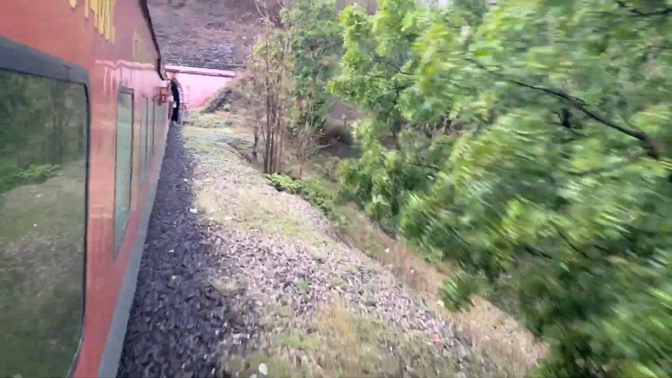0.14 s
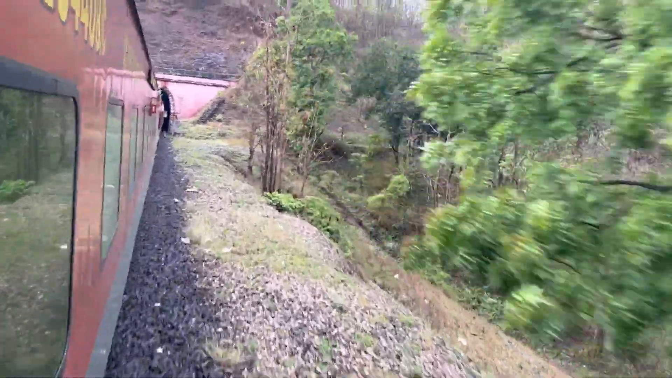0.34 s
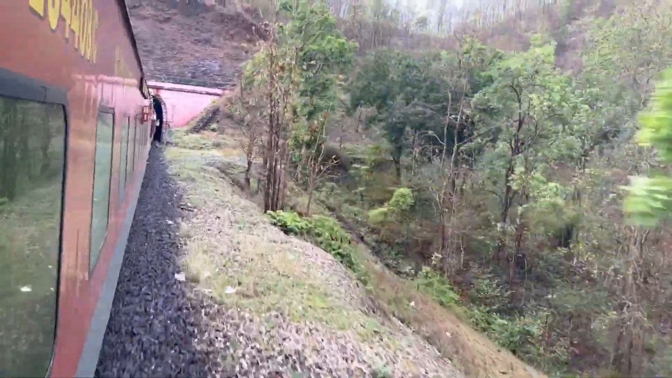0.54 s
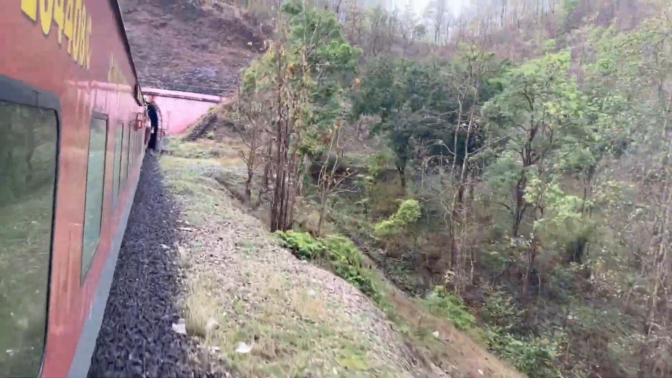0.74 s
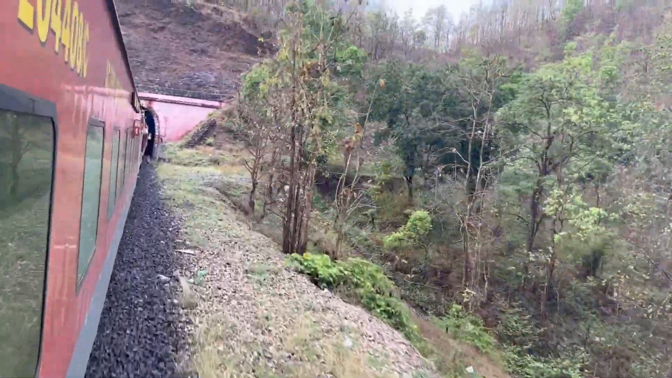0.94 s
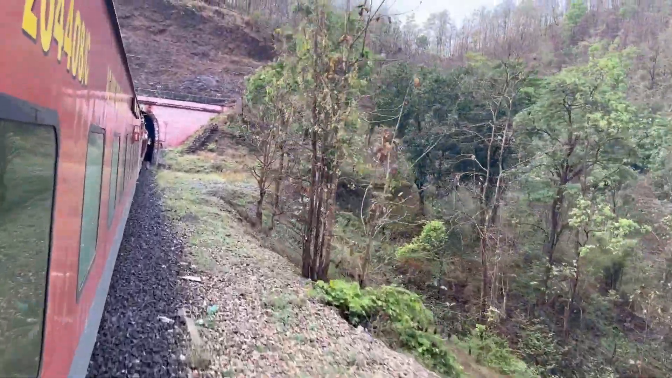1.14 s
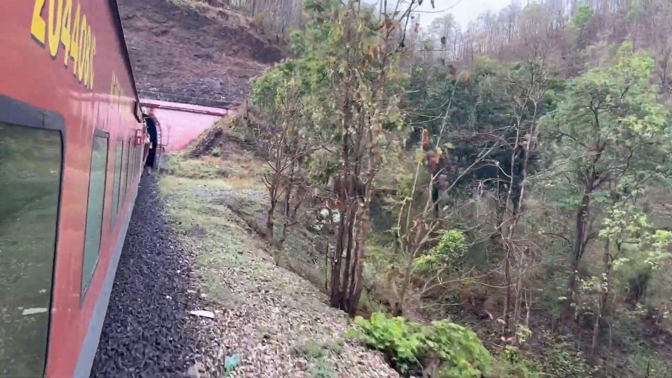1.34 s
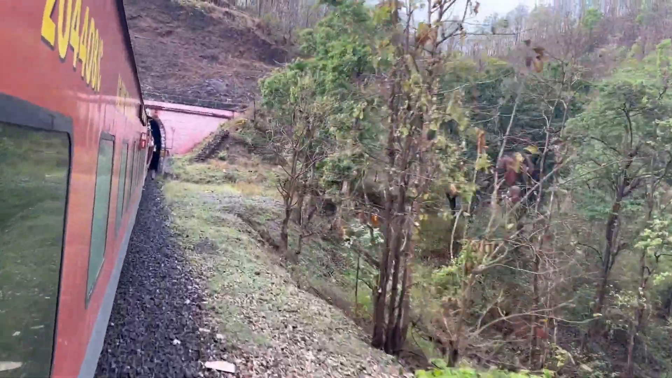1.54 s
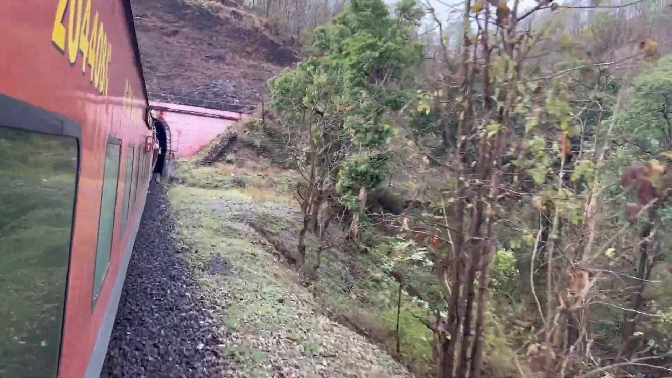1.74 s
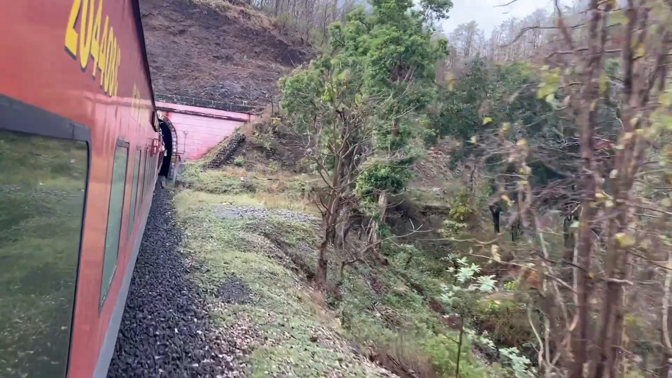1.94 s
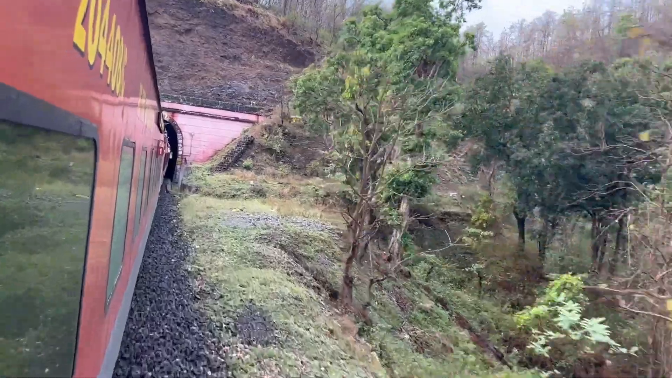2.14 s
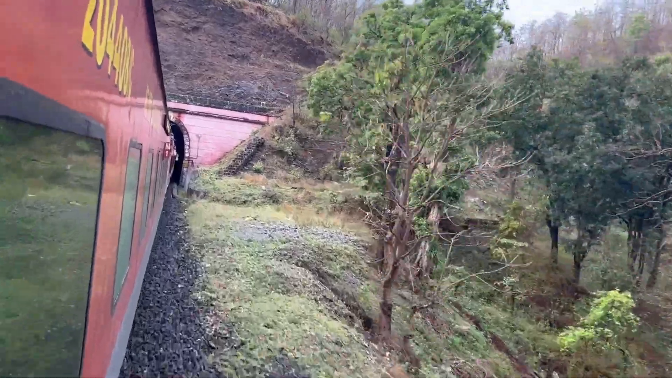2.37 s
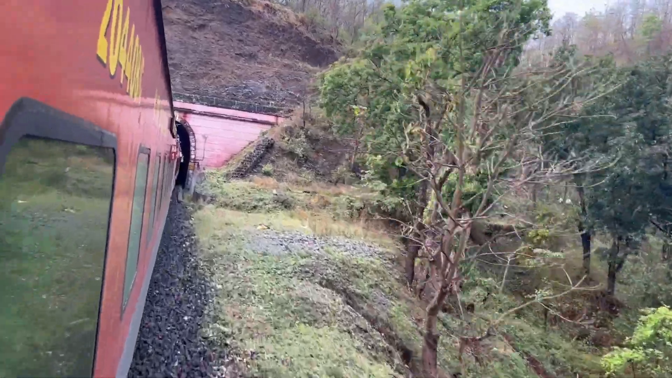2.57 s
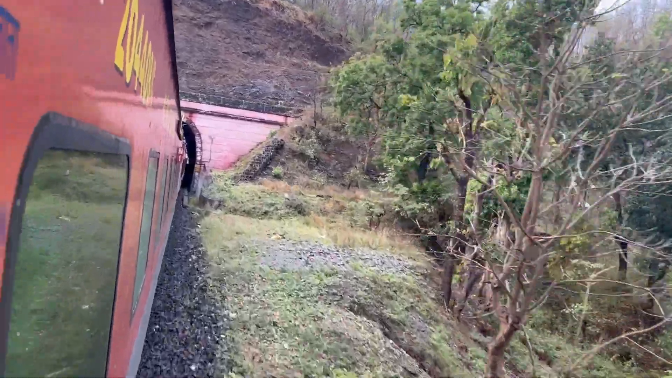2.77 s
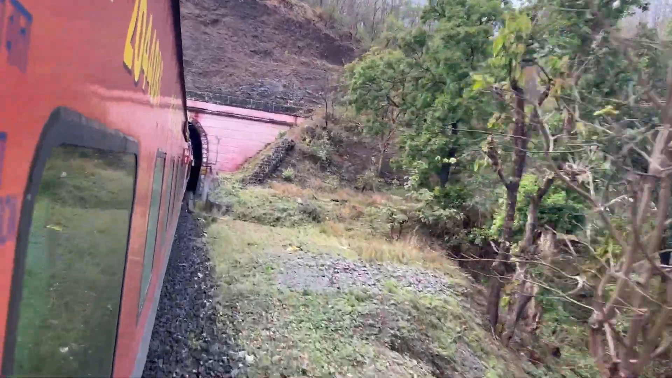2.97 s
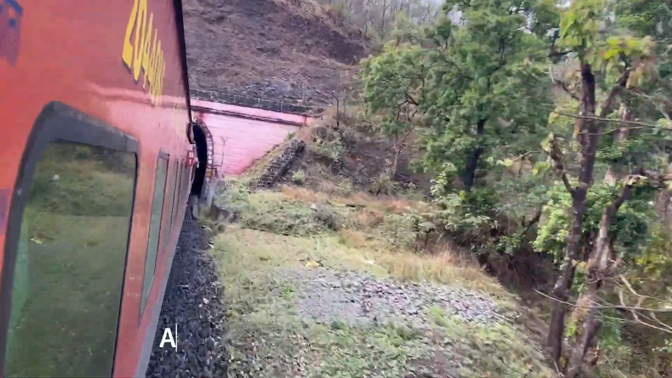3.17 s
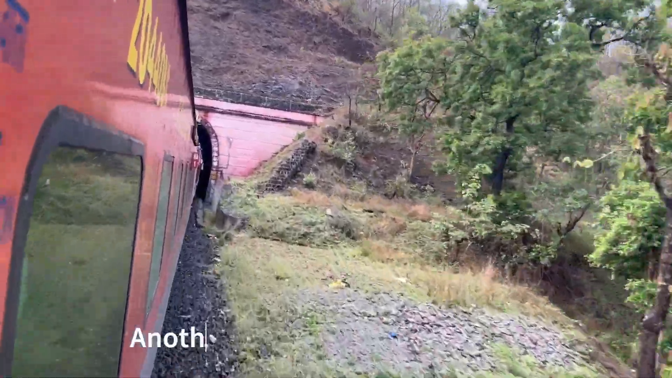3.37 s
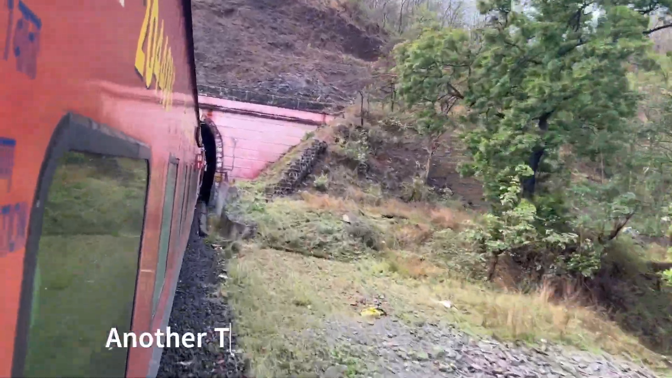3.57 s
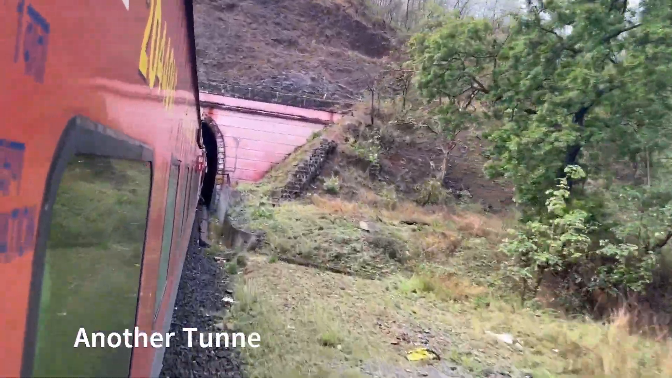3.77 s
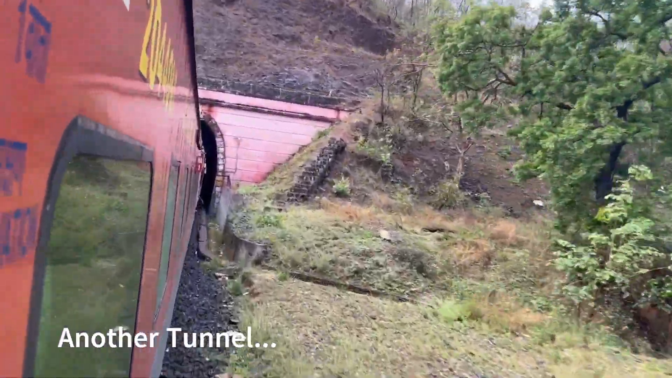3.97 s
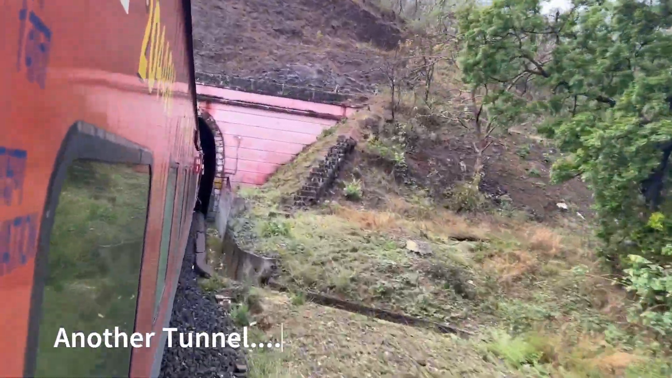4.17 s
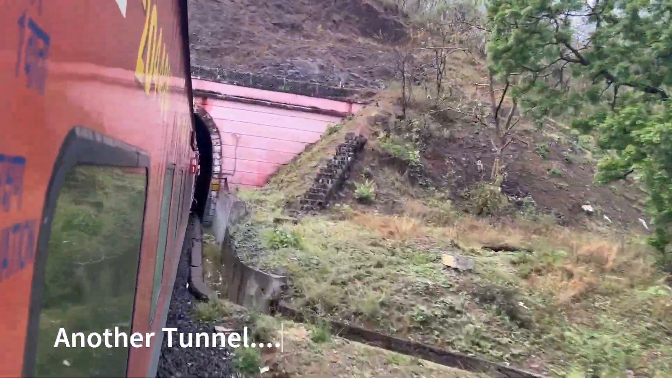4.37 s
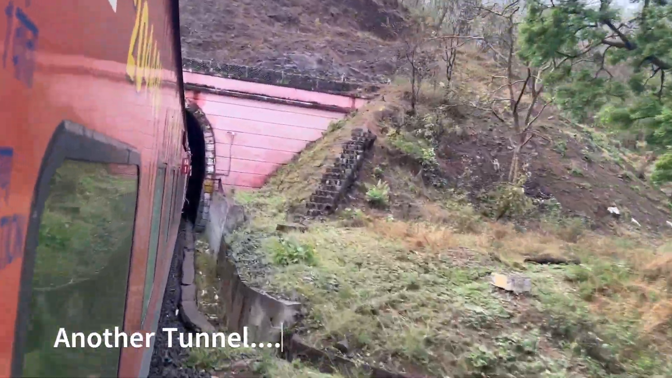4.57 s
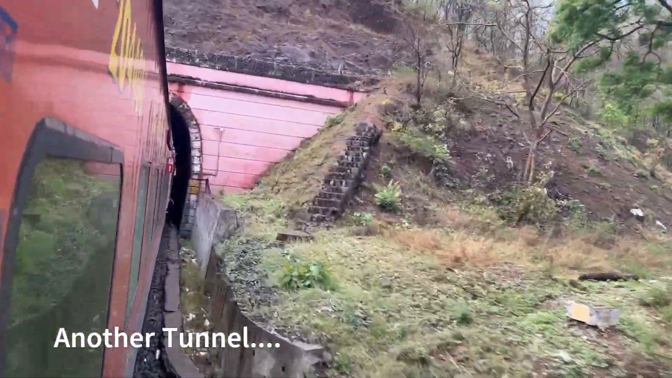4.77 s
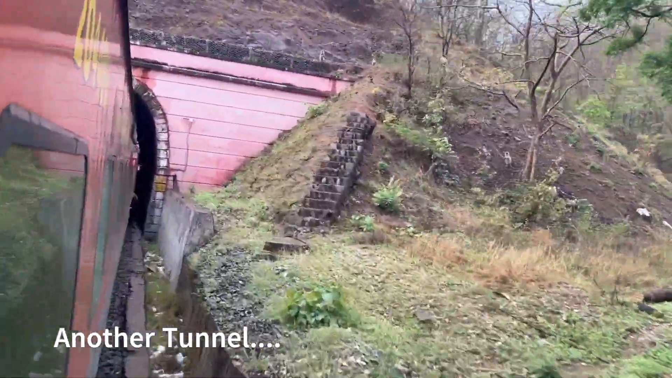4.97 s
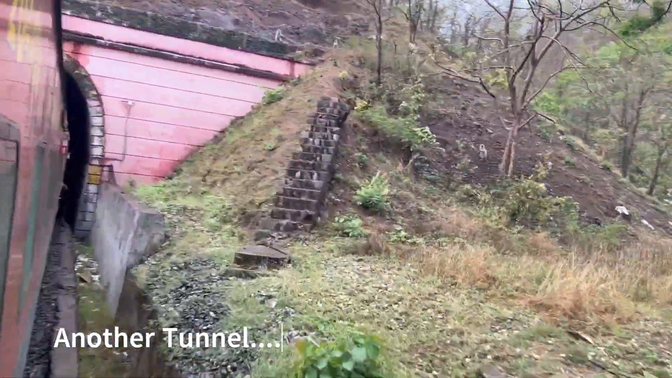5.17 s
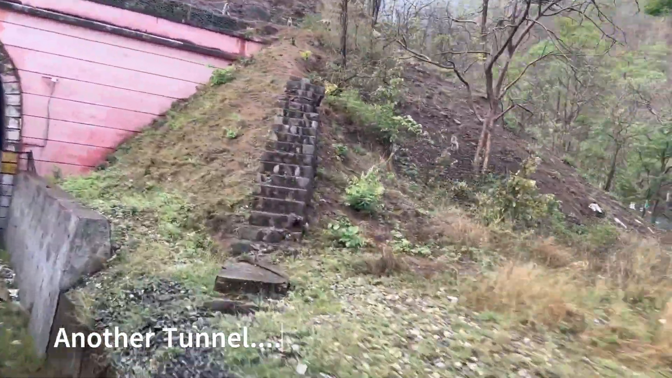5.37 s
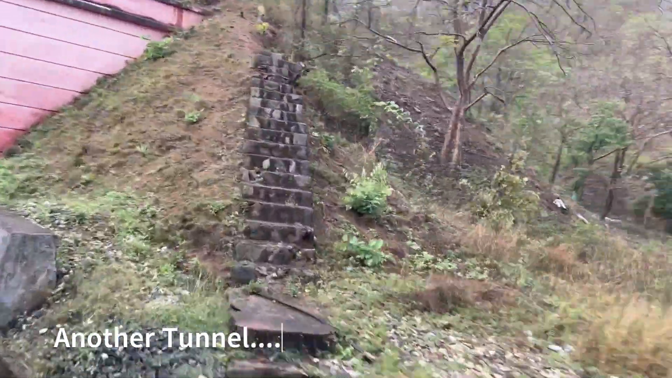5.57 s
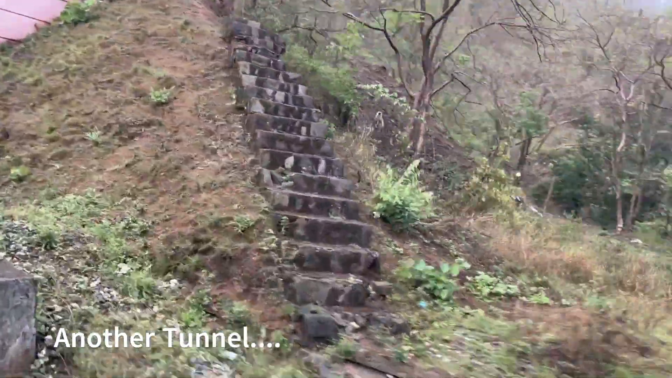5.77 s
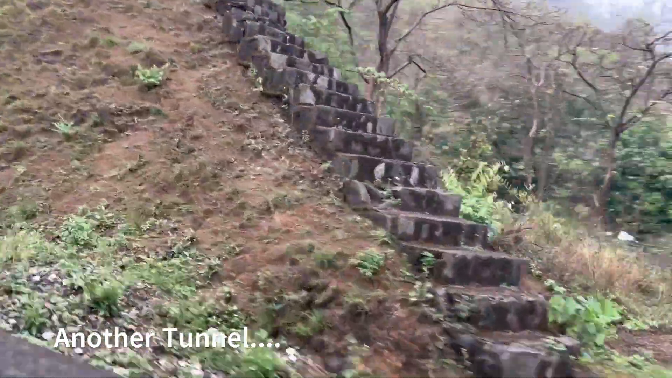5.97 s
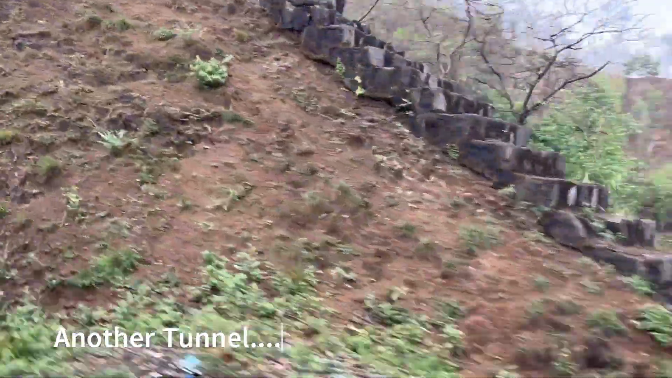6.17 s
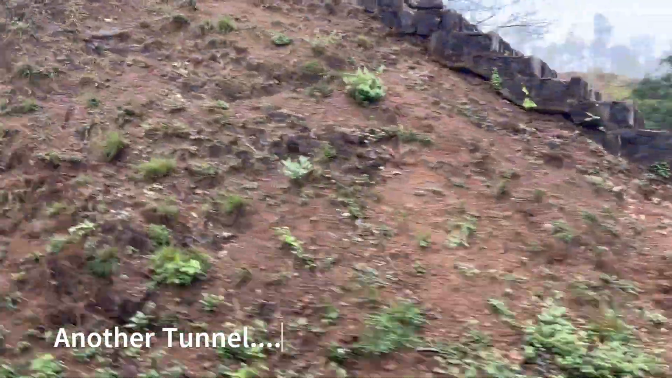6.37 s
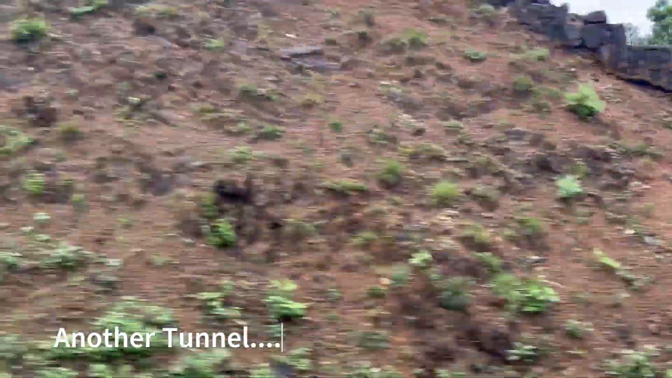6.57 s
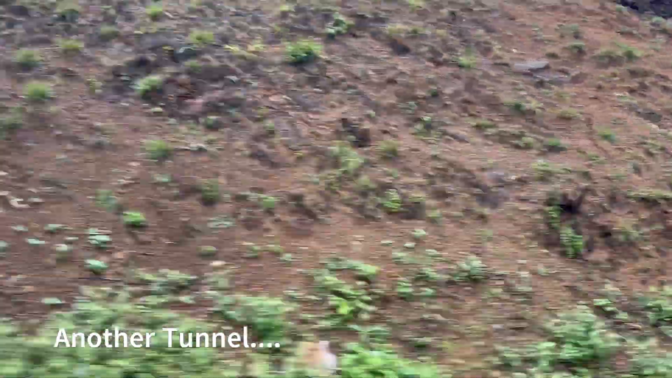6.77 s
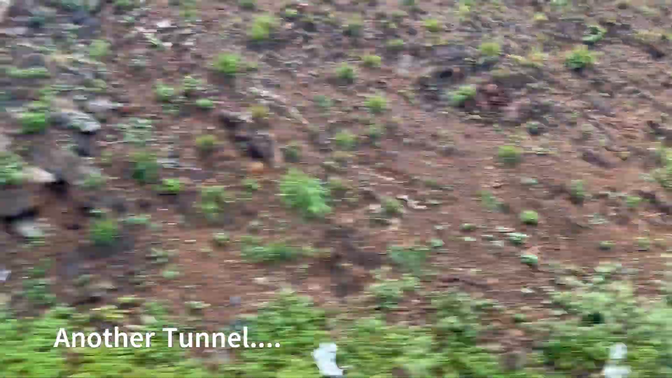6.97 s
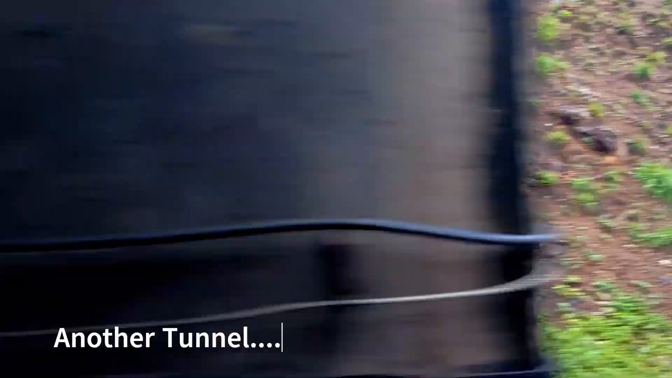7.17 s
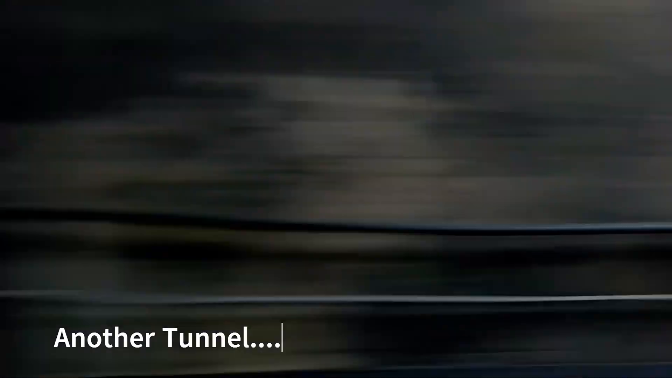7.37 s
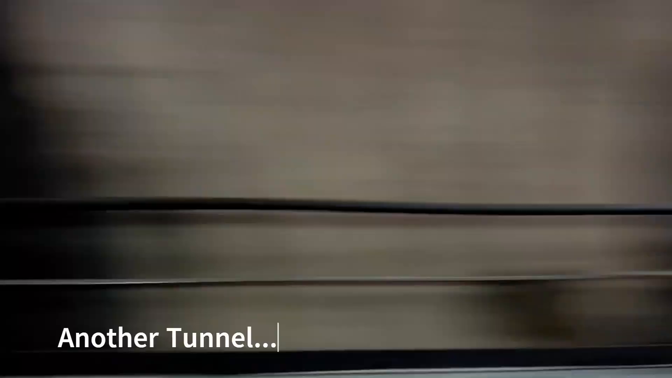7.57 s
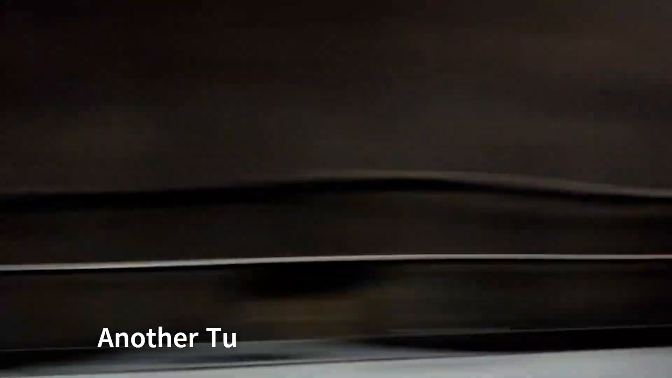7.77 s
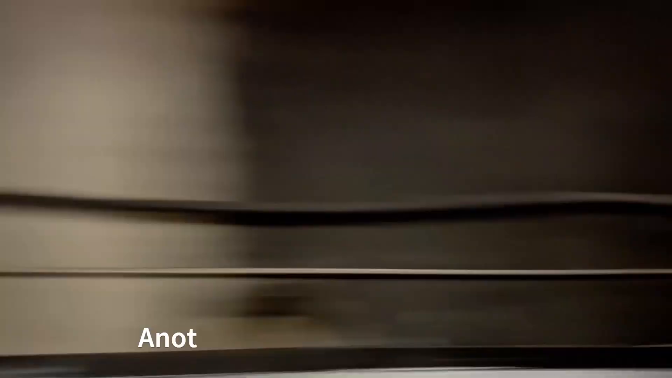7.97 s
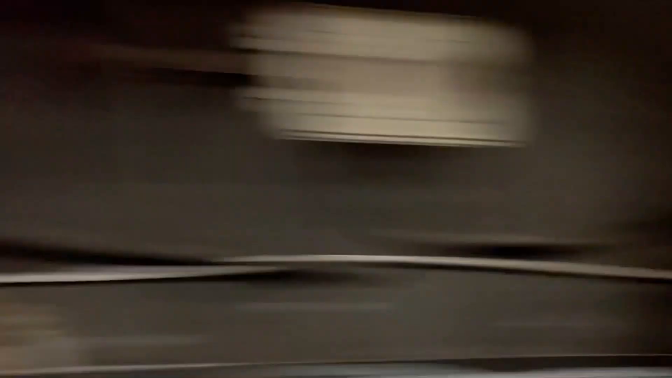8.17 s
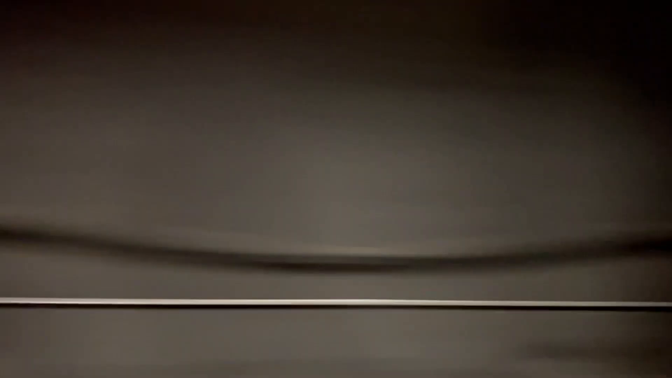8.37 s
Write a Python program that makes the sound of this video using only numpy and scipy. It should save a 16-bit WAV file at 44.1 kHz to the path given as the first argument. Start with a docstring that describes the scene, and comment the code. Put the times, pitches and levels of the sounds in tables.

```python
"""Gusty slipstream buffets a phone held out of the door of a running passenger train: eddies as coloured pops
and one-cycle slaps, over band noise for the roar of wheels on rails and a hiss that throbs once a wheel turn.
Noise bursts clack at the joints, single cycles tick, bands of roar flare, and sine tones sing from a wheel.
A cutting throws the roar back; then the tunnel mouth swallows the wind and modes of the bore fill it with a
deep boom."""
import sys
import numpy as np
from scipy import signal
from scipy.fft import rfft, irfft, next_fast_len
from scipy.io import wavfile
from scipy.ndimage import uniform_filter1d

SR = 44100
rng = np.random.default_rng(int(sys.argv[2]) if len(sys.argv) > 2 else 0)


def wav_out(sig):
    """Save sig, one row per channel (or a flat mono array), as 16-bit PCM at SR to the path in sys.argv[1]."""
    wavfile.write(sys.argv[1], SR, np.round(np.clip(np.atleast_2d(sig).T, -1, 1) * 32767).astype(np.int16))


N = 371753
BINS = next_fast_len(N)

# Spectra are relative: (frequency [Hz], level [dB])
# steady rolling through the coach
RUMBLE_SPECTRUM = [(53, -28), (90, -3.5), (284, -2.5), (349, -3), (661, -12), (1200, -20), (1560, -57),
                   (2640, -120)]
RUMBLE_DB = -29
# rail roar
ROAR_SPECTRUM = [(470, 2), (800, -0.5), (1280, -7), (1540, -7), (2010, -8.5), (2720, -10), (3590, -13),
                 (3970, -12), (4540, -13.5), (6000, -27), (7800, -23), (13200, -120)]
# tread hiss
HISS_SPECTRUM = [(1500, -58), (3000, -19), (4500, -1), (5500, -4.5), (7000, -3), (8500, -5.5),
                 (11000, -9.5), (12500, -8.5), (14500, -13.5), (15100, -18), (16000, -30)]
# open-air eddies
EDDY_SPECTRUM = [(53, -71), (90, 2.5), (452, -2.5), (901, -17), (1420, -28.5), (1550, -26), (1990, -33.5),
                 (3000, -31.5), (3900, -75), (6600, -120)]
# open-air slow buffeting
BUFFET_SPECTRUM = [(12, -51), (20, -29), (34, -18), (54, 2.5), (70, 2), (160, -8), (210, -5.5), (350, -120)]
# roar off the cutting
CUTTING_SPECTRUM = [(59, -52), (100, -21), (220, 0), (334, -2.5), (367, -2), (576, 0.5), (855, -10),
                    (1600, -20.5), (2080, -35), (3520, -120)]
# roar in the tunnel bore
BORE_SPECTRUM = [(59, -36), (100, -6), (116, -5.5), (225, -4), (350, 1), (436, -3.5), (700, -11),
                 (972, -15), (1160, -31), (1600, -25), (2080, -45), (3520, -120)]
# deep boom of the bore
BOOM_SPECTRUM = [(12, -51), (20, -19), (35, -43), (54, 5.5), (86, -0.5), (113, 5.5), (160, -4), (210, -12),
                 (350, -120)]
# unlike sound at the two ports: (frequency [Hz], side minus mid [dB])
PORT_DIFFERENCE = [(60, -19), (110, -15.5), (200, -10), (400, -8), (700, -5.5), (1250, -0.5), (1550, 2),
                   (1800, -9.5), (2600, -3.5), (4400, -4), (6000, 6.5)]
# balance of the ports: (frequency [Hz], left minus right [dB])
LEFT_LEAN = [(60, 0), (110, 0), (200, 0.0), (380, 1.0), (700, 4), (1290, -2), (2380, 3.5), (4400, 2),
             (8120, 10), (15000, -5.5)]

# Resonances: (frequency [Hz], width [Hz], relative level [dB])
WHEEL_MODES = [(1540, 56, 0), (1787, 51, 1), (2164, 18, 0), (2342, 40, -2.5), (2683, 60, -5),
               (3205, 66, -7), (3946, 62, -7.5), (4660, 150, -14.5)]
BORE_MODES = [(101, 43, -4), (125, 24, -8), (209, 48, -7), (352, 44, 0.5), (476, 50, -9), (610, 83, -12.5)]

# wheels on rail: (time [s], hiss between throbs [dB], roar [dB], nominal throb height [dB])
ROLLING = [(0, -49.5, -35, 4), (.8, -48.5, -36, 4), (1.2, -49.5, -39, 0.5), (1.6, -50, -34, 5.5),
           (2.5, -50, -37, 3), (3, -49, -33, 1), (3.45, -50, -35, 1), (3.7, -47.5, -33.5, 4.5),
           (4.6, -49.5, -33, 4.5), (5.1, -44.5, -29.5, 1), (5.6, -46, -31, -0.5), (6.02, -48, -30.5, 5.5),
           (6.3, -45, -27, 7.5), (6.7, -41.5, -27.5, 9), (6.9, -41, -25, 2), (7.05, -43, -25, 4),
           (7.3, -45.5, -26.5, 7.5), (7.7, -41.5, -29.5, 6.5), (7.95, -43.5, -29.5, 6),
           (8.2, -45, -29.5, 6), (8.43, -45, -29, 2)]
# extra hiss off the throb: (time [s], hiss level [dB], 1/e half-width [s])
SWISHES = [(1.447, -43.5, 0.024), (2.521, -38, 0.009), (2.89, -45, .03), (3.055, -42, 0.018),
           (4.34, -47, .03), (6.31, -35.5, 0.026), (6.523, -39, 0.02), (6.816, -32.5, 0.05),
           (7.1, -43, 0.02)]
# bands that flare: (time [s], bell sigma [s], centre [Hz], bandwidth [Hz], rms before the bell [dB])
FLARES = [(.705, .012, 4600, 400, -46), (.74, .022, 4900, 600, -42), (2.513, .004, 6200, 2600, -37),
          (5.1, .15, 4500, 800, -46), (5.06, .07, 2700, 250, -42), (5.22, .02, 2500, 700, -37),
          (6.792, .009, 680, 300, -14), (6.792, .006, 1150, 300, -21), (7.45, .12, 450, 400, -21),
          (6.81, .025, 1600, 1300, -26), (6.835, .025, 2900, 2600, -28), (7.6, 0.046, 12540, 80, -52),
          (7.76, .06, 11080, 120, -49), (8.18, .04, 11080, 120, -49), (6.3, 0.031, 479, 50, -20.5),
          (6.4, .02, 480, 50, -20.5), (6.94, .02, 362, 40, -20.5), (6.99, .04, 540, 60, -18.5),
          (7.11, 0.039, 503, 90, -19), (7.25, .03, 535, 60, -22), (7.3, 0.098, 850, 200, -28),
          (7.39, .04, 370, 40, -15.5), (7.559, 0.049, 356, 30, -14.5), (7.79, 0.027, 500, 90, -24),
          (8.3, 0.031, 476, 81, -24)]
# singing wheel: (start [s], rise [s], fade t60 [s], pitch [Hz], pitch arch [Hz], nominal level [dB])
SONGS = [(2.222, 0.025, 2.5, 1603, 0, -31), (2.44, .01, .3, 1585, 0, -36), (3.046, .015, .12, 1545, 0, -29),
         (4.415, .008, .1, 1490, 0, -31), (6.791, .016, 0.13, 1770, -2, -14),
         (6.795, .03, .1, 3236, 2, -23), (6.825, .012, .13, 1790, 0, -23), (6.785, .015, .3, 2170, 0, -27),
         (6.81, .012, .15, 4000, 0, -31), (6.79, .012, .12, 2640, 0, -28), (6.785, .01, .1, 1150, 0, -24),
         (7.085, 0.023, .2, 2340, 0, -33)]
# metal on metal: (time [s], nominal level [dB], centre [Hz])
TICKS = [(0.255, -25, 1500), (0.5407, -19, 1500), (1.9804, -24, 1500), (2.2508, -15, 1200),
         (2.3401, -21, 1500), (2.5105, -27, 6000), (2.7871, -15, 1200), (2.8654, -20, 1500),
         (3.0524, -19, 1500), (3.4526, -21, 1500), (3.4634, -22, 1500), (4.2527, -22, 1500),
         (4.3655, -19, 1500), (4.69, -20, 1500), (5.3044, -20, 1500), (5.3507, -15, 1150),
         (5.3732, -17, 1300), (5.4141, -19, 1500), (5.4805, -11, 1050), (5.5698, -17, 1300),
         (5.582, -17, 1400), (5.5974, -20, 1500), (5.7159, -12, 1400), (5.738, -16, 1400),
         (5.8584, -10, 1100), (6.7895, -14, 1100), (7.0773, -16, 2400), (7.106, -14, 1500)]
# wheels over joints: (time [s], blow level [dB], clank centre [Hz], thud re blow [dB], treble re blow [dB],
# wheel ring re blow [dB], t60 [s]); levels before the mix gains in joints()
CLACKS = [(2.3422, -26, 1570, 1, -27.5, -6, 0.096), (2.5045, -27, 2600, -13, -5, -19, 0.13),
          (2.8657, -23.5, 1890, 1, -23, -17, 0.17), (3.052, -21.5, 1540, 5.5, -26, -6, 0.13),
          (3.4516, -20.5, 1490, -5, -29, -10, 0.14), (5.5714, -20, 1450, 6, -26, -9, 0.11),
          (5.7292, -18, 1450, 5, -27, -11, 0.1), (6.1467, -22.5, 2640, 7, -19, -23, 0.14),
          (6.2995, -33, 1550, 6, -17, -12, 0.12), (6.494, -21, 1460, 3, -12, -14, 0.15),
          (6.7885, -19, 1740, 3.5, -12, -13, 0.22), (7.0773, -14.5, 2200, 2, -11, -21, 0.13),
          (7.1055, -20, 1600, 2, -18, -12, .22)]
# strong eddies: (time [s], nominal level [dB], centre [Hz], edge re slap [dB], flutter decay to 1/e [s]);
# levels before the mix gains in slaps()
SLAPS = [(0.158, -12, 301, -22, 0.01), (0.252, -18, 308, -20, 0.014), (0.338, -16, 317, -23, 0.012),
         (0.939, -13, 316, -22, 0.016), (1.138, -16, 384, -26, 0.0089), (1.29, -13, 380, -30, 0.0058),
         (1.349, -6.5, 326, -21, 0.003), (1.418, -12.5, 363, -18, 0.0098), (1.524, -10, 430, -28, 0.0076),
         (1.898, -14, 646, -22, 0.012), (1.983, -14, 301, -27, 0.0087), (1.975, -14, 666, -23, 0.012),
         (2.151, -10.5, 375, -21, 0.009), (2.249, -5, 317, -35, 0.0074), (2.288, -8, 375, -26, 0.0037),
         (2.34, -11, 493, -14, 0.012), (2.777, -10, 720, -24, .004), (2.787, -8, 210, -14, .004),
         (2.862, -13, 680, -20, .008), (2.986, -14, 470, -23, 0.0078), (3.351, -14, 365, -23, 0.014),
         (3.393, -12, 466, -23, 0.014), (3.457, -9.5, 455, -21, 0.013), (3.572, -18, 307, -17, 0.0036),
         (3.758, -11.5, 576, -17, 0.0059), (4.123, -11.5, 580, -22, 0.0089), (4.199, -16, 560, -20, .006),
         (4.804, -11.5, 414, -8, 0.022), (5.299, -4.5, 307, -26, 0.011), (5.322, -9, 300, -25, .008),
         (5.374, -8.5, 446, -29, 0.017), (5.412, -13, 650, -16, .006), (5.435, -14, 600, -18, .005),
         (5.47, -7, 388, -25, 0.01), (5.566, -13, 700, -16, 0.008), (5.577, -11, 520, -14, .008),
         (5.644, -15, 800, -14, .008), (5.714, -13, 564, -6, 0.008), (5.73, -11.5, 480, -9, 0.012),
         (5.797, -15, 800, -16, .004), (5.814, -8, 392, -28, 0.011), (5.858, -8.5, 530, -32, 0.013),
         (6.223, -9.5, 660, -17, 0.013), (6.38, -13, 480, -17, 0.011)]
# surroundings: (time [s], share of reflected sound [0-1], tunnel share of that [0-1])
WALLED = [(0, 0.13, 0.17), (3, 0.11, 0.8), (5.2, 0.15, 0.28), (5.9, 0.5, 0.25), (6.5, 0.98, 0.06),
          (6.85, 0.77, 0.01), (7.2, 0.96, 0.84), (8.43, 0.75, 0.88)]
# slow course of the air: (time [s], eddies or reflected roar [dB], buffeting or boom [dB])
AIR = [(0, -23, -22), (.5, -23.5, -22), (1.0, -23, -22.5), (1.5, -22.5, -20.5), (2.08, -28.5, -27),
       (2.7, -26.5, -25), (3.5, -21, -22), (3.9, -24, -27), (4.3, -21, -22.5), (5.1, -22, -24),
       (5.8, -21, -19.5), (6.0, -27, -28.5), (6.3, -18, -26), (6.48, -25, -30), (6.72, -18.5, -36),
       (6.9, -17.5, -38), (7.0, -16.5, -19.5), (7.25, -14, -15), (7.57, -14, -18), (7.68, -16.5, -14.5),
       (8.43, -16.5, -18)]
# gusts, or surges of the boom: (time [s], 1/e half-width [s], eddies or roar [dB], buffeting or boom [dB])
GUSTS = [(.11, 0.0092, -20, -22), (0.342, 0.0092, -19, -16), (0.615, 0.1, -21.5, -27),
         (0.945, 0.029, -21.5, -18), (1.155, 0.026, -19.5, -26), (1.378, 0.019, -22.5, -29),
         (1.52, 0.059, -23.5, -19), (1.826, 0.018, -19, -23), (1.964, 0.036, -14.5, -16),
         (2.303, 0.074, -21.5, -18.5), (2.53, 0.014, -19.5, -30), (2.86, 0.015, -24, -21),
         (3.004, 0.016, -19.5, -17), (3.1, .04, -26, -22), (3.398, .03, -22.5, -22), (3.6, 0.015, -21, -30),
         (3.784, 0.028, -18, -27), (3.993, 0.064, -23, -20), (4.524, 0.018, -20.5, -22),
         (4.892, 0.077, -18, -24), (5.33, 0.035, -18, -27), (5.454, 0.025, -15.5, -14),
         (5.58, 0.013, -26, -19), (5.73, 0.018, -17.5, -18), (5.85, 0.069, -21, -18),
         (6.121, 0.02, -19, -33), (6.29, .03, -22, -18), (6.389, 0.026, -14.5, -13),
         (6.623, 0.055, -30, -21.5), (6.805, .03, -15.5, -37), (7.217, 0.035, -24, -12.5),
         (7.414, .03, -17.5, -15), (7.562, 0.037, -16, -22), (7.83, 0.049, -22, -15),
         (8.106, 0.03, -29, -14), (8.403, 0.021, -20, -13)]

# *_SCALE_DB multiplies walk()
FLUTTER_SCALE_DB, FLUTTER_PER_S, HEAVE_SCALE_DB, HEAVE_PER_S = 3.5, 17, 1.5, 10
RING_DB, RING_WANDER_SCALE_DB = -7.5, 2.5
FIRST_THROB_S, TURNS_PER_S, TURNS_GAIN_PER_S2 = 0.12, 4.77, 0.016  # the train gathers a little speed
THROB_SHARPNESS, THROB_SCATTER, ROAR_THROB_SHARE = 1.6, 0.18, 0.37
SONG_WAVER_SCALE_DB, SONG_WAVER_PER_S, SONG_SIDE = 2.5, 90, 0.45
TICK_DECAY_CYCLES, TICK_SIDE = 0.6, 0.5
# treble in step, in opposition; above BEAM_HZ it comes from one direction
ALIKE_HZ, OPPOSED_HZ, BEAM_HZ = 6800, 9790, 5700
NOTCH_WIDTH, SCATTERED_SHARE = 0.21, 0.6  # width of the treble gap in the sum; unlike treble
HEADROOM, TOP_HZ = 1.05, 15725


def undb(db):
    """Decibels to gain."""
    return 10 ** (np.asarray(db) / 20)


def level(x, db):
    """Scale to an rms level."""
    return x * undb(db) / np.sqrt(np.mean(x ** 2))


def curves(table):
    """Table columns interpolated to one value per sample."""
    s, *columns = np.transpose(table)
    return [np.interp(np.arange(N) / SR, s, column) for column in columns]


def bin_hz():
    """Frequency of each bin."""
    return np.fft.rfftfreq(BINS, 1 / SR)


def shape(table):
    """Gain per bin, interpolated in dB over log frequency."""
    hz, db = np.transpose(table)
    return undb(np.interp(np.log(bin_hz() + 1), np.log(hz), db))


def colour(table, db, x):
    """Filter by a spectrum table and set the rms level."""
    return level(irfft(rfft(x, BINS) * shape(table), BINS)[:, :N], db)


def band(x, low_hz, top_hz):
    """Steep band-pass."""
    sos = signal.butter(3, [low_hz, top_hz], "bandpass", fs=SR, output="sos")
    return signal.sosfilt(sos, x)


def ring(x, modes):
    """An object's modes, rung by whatever shakes it."""
    gain = sum(undb(db) / (1 + 2j * (bin_hz() - mode_hz) / width_hz) for mode_hz, width_hz, db in modes)
    return irfft(rfft(x, BINS) * gain, BINS)[:, :N]


def walk(rate_per_s):
    """Random held steps smoothed twice; rms about 0.74."""
    hold = int(SR / rate_per_s)
    steps = np.repeat(rng.standard_normal(N // hold + 1), hold)
    return uniform_filter1d(uniform_filter1d(steps, hold), hold)[:N]


def pair():
    """Two unrelated noises: what the ports share and what they do not."""
    return rng.standard_normal((2, N))


def add(out, s, sound):
    """Mix a short sound in at a time."""
    i = int(s * SR)
    out[:, i:i + sound.shape[-1]] += sound[:, :N - i]


def blend(a, b, share):
    """Constant-power cross-fade of unrelated sounds."""
    share = np.clip(share, 0, 1)
    return np.sqrt(1 - share) * a + np.sqrt(share) * b


def swells(steady_db, times, lengths, peaks_db):
    """A course in dB with bell-shaped swells added in power."""
    t = np.arange(N) / SR
    power = undb(2 * steady_db)
    for s, length, db in zip(times, lengths, peaks_db):
        near = slice(max(int((s - 3 * length) * SR), 0), int((s + 3 * length) * SR))
        power[near] += undb(2 * db) * np.exp(-((t[near] - s) / length) ** 2)
    return 10 * np.log10(power)


def rumble():
    """Steady rolling carried through the coach: low coloured noise."""
    return colour(RUMBLE_SPECTRUM, RUMBLE_DB, pair())


def tread(hiss_db, throb_db):
    """A rough patch of tread comes round once a turn, unevenly strong; single swishes are added. In dB."""
    t = np.arange(N) / SR - FIRST_THROB_S
    turns = TURNS_PER_S * t + TURNS_GAIN_PER_S2 * t ** 2 / 2
    patch = np.abs(np.cos(np.pi * turns)) ** (2 * THROB_SHARPNESS)
    patch = patch * (1 + THROB_SCATTER * walk(TURNS_PER_S))
    s, db, length = np.transpose(SWISHES)
    return swells(hiss_db + throb_db * patch, s, length, db)


def wheels(between_db, roar_db, throb_db, walled):
    """Rough tread and rail: throbbing hiss, and a roar with wheel modes that throbs less, least near walls."""
    hiss_db = tread(between_db, throb_db)
    throb = hiss_db - uniform_filter1d(hiss_db, size=SR // 2)
    hiss = colour(HISS_SPECTRUM, 1.0, pair() * undb(1.3 * walk(30)))
    roar = colour(ROAR_SPECTRUM, 0.86, pair() * undb(1.44 * walk(20)))
    rung = level(ring(pair() * undb(RING_WANDER_SCALE_DB * walk(7.2)), WHEEL_MODES), RING_DB)
    roar_course_db = roar_db + ROAR_THROB_SHARE * (1 - 0.6 * walled) * throb
    return undb(hiss_db) * hiss + undb(roar_course_db) * (roar + rung)


def flares():
    """Bands of roar or hiss that swell and sink."""
    out = np.zeros((2, N))
    for s, length, hz, width_hz, db in FLARES:
        t = np.arange(-3 * length, 3 * length, 1 / SR)
        noise = rng.standard_normal((2, len(t) + SR // 10))
        # drop the filter's run-in
        flare = band(noise, hz - width_hz / 2, hz + width_hz / 2)[:, -len(t):]
        add(out, s + t[0], level(flare, db) * np.exp(-(t / length) ** 2 / 2))
    return out


def songs():
    """A rubbing flange starts a wheel tone; it wavers in strength, may bend and return, and dies away."""
    out, t = np.zeros((2, N)), np.arange(SR // 2) / SR
    waver = undb(SONG_WAVER_SCALE_DB * walk(SONG_WAVER_PER_S))
    for s, rise, t60, hz, arch_hz, db in SONGS:
        fade_db = -60 * np.maximum(t - rise, 0) / t60
        swell = np.minimum(t / rise, 1) * undb(db + fade_db)
        pitch_hz = hz + arch_hz * np.sin(np.pi / 2 * np.minimum(t / rise, 2))
        tone = np.sin(2 * np.pi * np.cumsum(pitch_hz) / SR)
        add(out, s, swell * tone * np.array([[1], [SONG_SIDE]]))
    return out * waver


def ticks():
    """A hard metal contact: about one cycle, quickly over."""
    out, t = np.zeros((2, N)), np.arange(SR // 100) / SR
    signs = np.sign(rng.standard_normal((len(TICKS), 2)))
    for (s, db, hz), sign in zip(TICKS, signs):
        cycle = t * hz
        tick = undb(db) * np.sin(2 * np.pi * cycle) * cycle * np.exp(-cycle / TICK_DECAY_CYCLES) * 4
        add(out, s, tick * sign[:, None] * np.array([[1], [TICK_SIDE]]))
    return out


def joints():
    """Each blow is a noise burst: a thud in the rail, a clank, a bright crack and the ring of the wheel."""
    thud, clank, crack, shake = np.zeros((4, 2, N))
    t = np.arange(SR // 4) / SR
    for s, db, hz, thud_db, treble_db, ring_db, t60 in CLACKS:
        # rattle, plus a hard first contact
        fade = np.exp(-np.log(1000) * t / t60) + 0.5 * np.exp(-t / 0.0024)
        blow = undb(db) * rng.standard_normal((2, len(t))) * fade * np.minimum(t / 0.0015, 1)
        add(clank, s, undb(2.0) * band(blow, hz / 1.5, hz * 1.67))
        add(thud, s, undb(thud_db + 9.0) * blow)
        add(crack, s, undb(treble_db) * blow)
        add(shake, s, undb(ring_db + 12.0) * blow)
    return band(thud, 565, 1000) + clank + band(crack, 4000, 13500) + ring(shake, WHEEL_MODES)


def slaps():
    """A strong eddy: a push and pull of about one cycle, longer for a lower centre, with a rough flutter."""
    out, flutter, edges = np.zeros((3, 2, N))
    t = np.arange(SR // 10) / SR
    turn = rng.uniform(-0.76, 1, (len(SLAPS), 2))
    for (s, db, hz, edge_db, decay_s), (start, side) in zip(SLAPS, turn):
        cycle = t * hz
        push = np.sin(2 * np.pi * cycle + np.pi * start) * cycle * np.exp(-cycle / 0.58) * 4
        rough = undb(db) * rng.standard_normal((2, len(t)))
        rough = rough * np.exp(-t / decay_s) * np.minimum(t / 0.0016, 1)
        add(out, s, undb(db + 1.0) * push * np.array([[1], [side]]))
        add(flutter, s, undb(8) * rough)
        add(edges, s, undb(edge_db + 4.5) * rough)
    return out + band(flutter, 280, 937) + band(edges, 1350, 1900)


def gusting(walled):
    """Eddy and buffeting levels in dB: slow course, strong gusts, and a flutter that calms between walls."""
    eddy_db, sway_db = curves(AIR)
    s, length, eddy_peak_db, sway_peak_db = np.transpose(GUSTS)
    flutter_db = FLUTTER_SCALE_DB * np.clip(1 - walled, 0, 1) * walk(FLUTTER_PER_S)
    heave_db = HEAVE_SCALE_DB * walk(HEAVE_PER_S)
    return (swells(eddy_db + flutter_db, s, length, eddy_peak_db),
            swells(sway_db + heave_db, s, length, sway_peak_db))


def wind(gust_db, sway_db, walled, bored):
    """Eddies burst on the ports as uneven pops; near walls a smooth reflected roar replaces them."""
    hits = rng.random((2, N)) < 1400 / SR  # 1400 per second on average
    pops = hits * rng.standard_normal((2, N)) * undb(2.73 * walk(60))
    bore_modes = level(ring(pair(), BORE_MODES), 0)
    bore = blend(colour(BORE_SPECTRUM, 0, pair()), bore_modes, 0.15)
    walls = blend(colour(CUTTING_SPECTRUM, 0, pair()), bore, bored)
    air = blend(colour(EDDY_SPECTRUM, 0, pops), walls * undb(0.97 * walk(15)), walled)
    buffet = colour(BUFFET_SPECTRUM, 0.058, pair())
    boom = colour(BOOM_SPECTRUM, 0.19, pair())
    sway = blend(buffet, boom, bored * walled)
    return undb(gust_db) * air + undb(sway_db) * sway


def ports(sound):
    """Two ports share sound in part; treble reaches one later, so sum and difference comb."""
    shared, unshared = rfft(sound, BINS)
    beam = 1 / (1 + (BEAM_HZ / (bin_hz() + 1)) ** 12)
    half_lag = np.pi / 2 * (bin_hz() - ALIKE_HZ) / (OPPOSED_HZ - ALIKE_HZ)
    in_step = np.cos(half_lag)
    comb = in_step ** 3 / (in_step ** 2 + NOTCH_WIDTH) / (0.11 + np.abs(in_step))
    mid = shared * (1 - beam + beam * comb)
    lean = shape(LEFT_LEAN)
    apart = (0.93 * unshared + 0.25j * shared) * shape(PORT_DIFFERENCE)
    apart = apart + shared * (lean - 1) / (lean + 1)
    # part of the treble arrives scattered and differs between the ports
    treble_side = np.sin(half_lag) * (SCATTERED_SHARE * unshared - 0.75j * shared)
    side = (1 - beam) * apart + beam * treble_side
    return irfft(np.array([mid + side, mid - side]), BINS)[:, :N]


def scene():
    """Train and slipstream summed, then heard at the two ports."""
    walled, bored = curves(WALLED)
    train = rumble() + wheels(*curves(ROLLING), walled) + flares() + songs() + ticks() + joints()
    air = slaps() + wind(*gusting(walled), walled, bored)
    return ports(train + air)


def record(dry):
    """The phone rounds the loudest peaks and cuts the top."""
    rounded = dry / (1 + (dry / HEADROOM) ** 4) ** 0.25
    return signal.sosfilt(signal.ellip(8, 0.2, 70, TOP_HZ, fs=SR, output="sos"), rounded)


dry = scene()
out = record(dry)
wav_out(out)
```